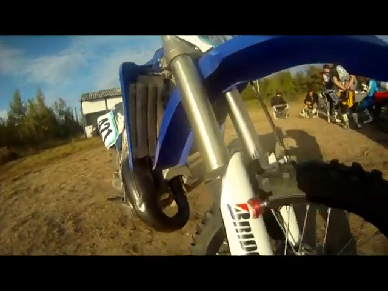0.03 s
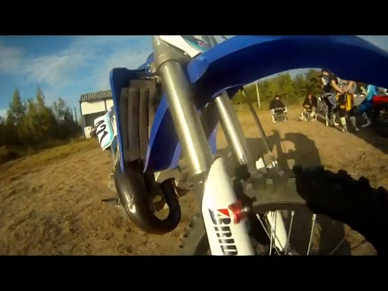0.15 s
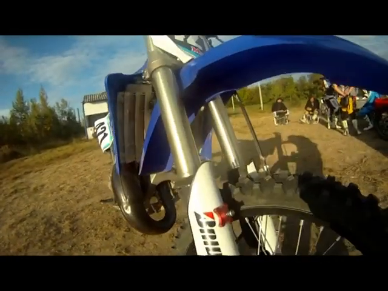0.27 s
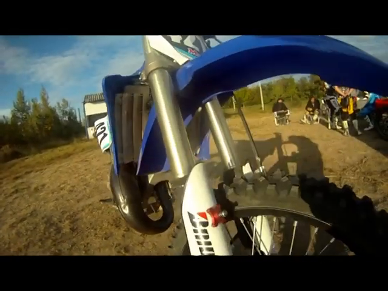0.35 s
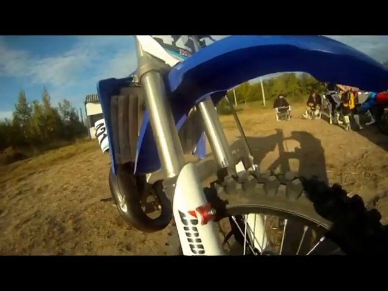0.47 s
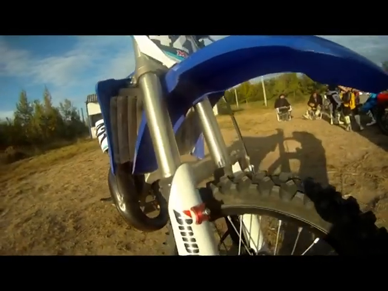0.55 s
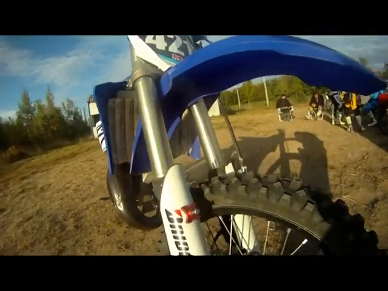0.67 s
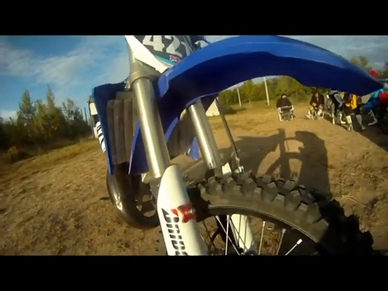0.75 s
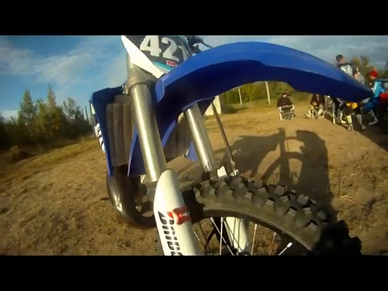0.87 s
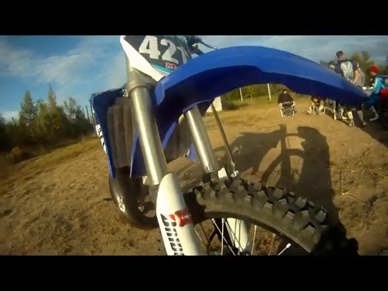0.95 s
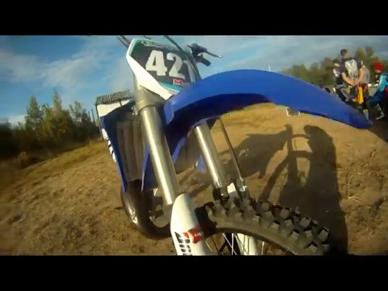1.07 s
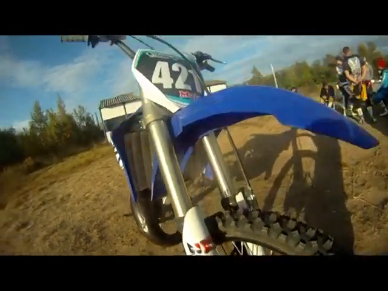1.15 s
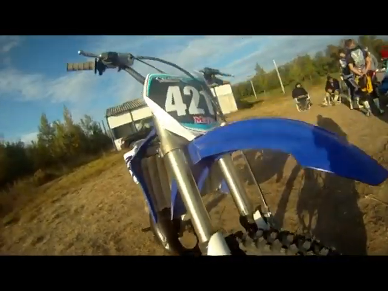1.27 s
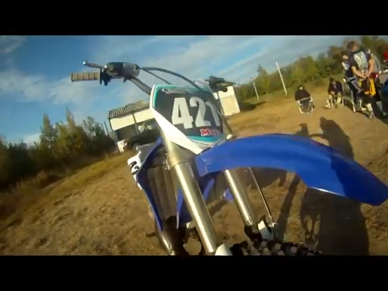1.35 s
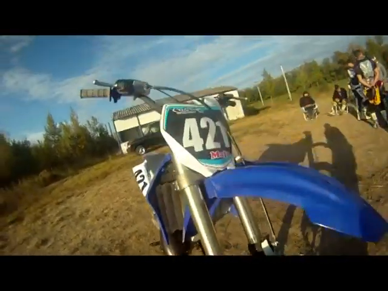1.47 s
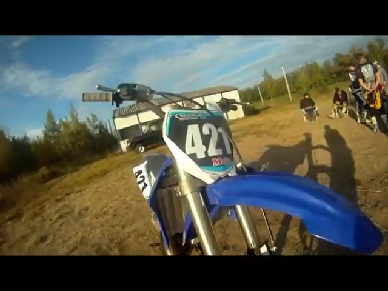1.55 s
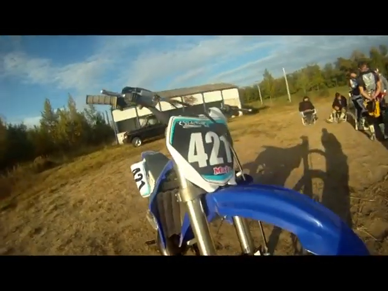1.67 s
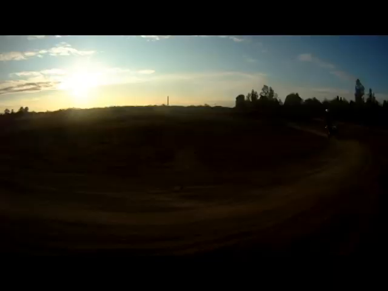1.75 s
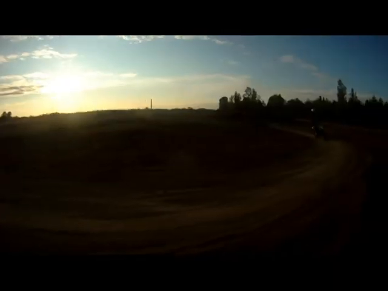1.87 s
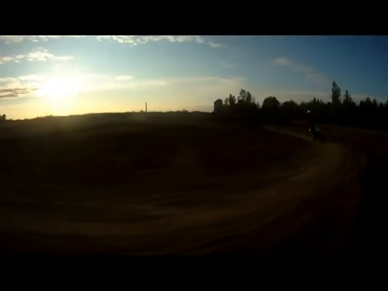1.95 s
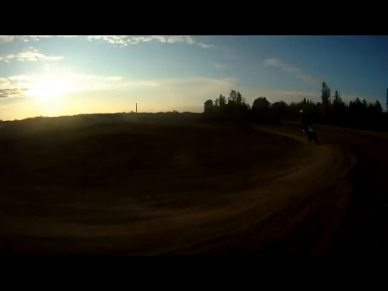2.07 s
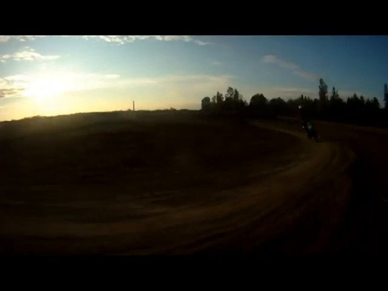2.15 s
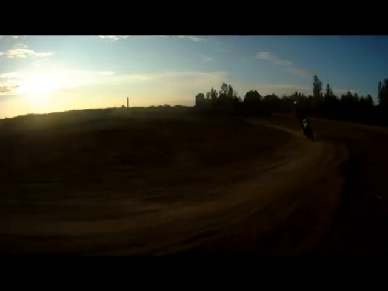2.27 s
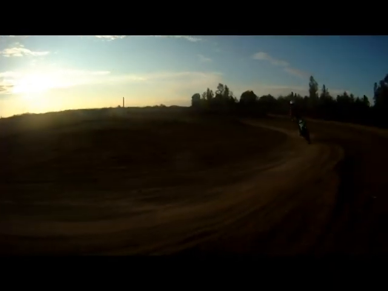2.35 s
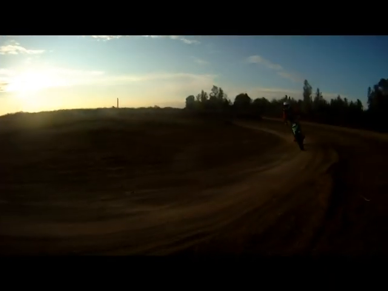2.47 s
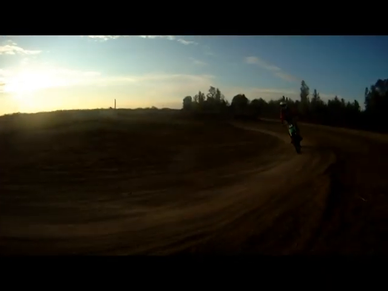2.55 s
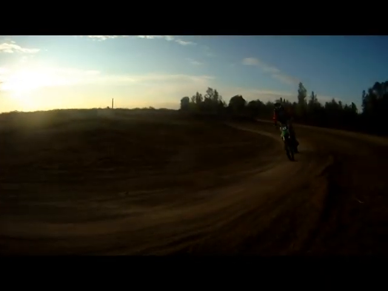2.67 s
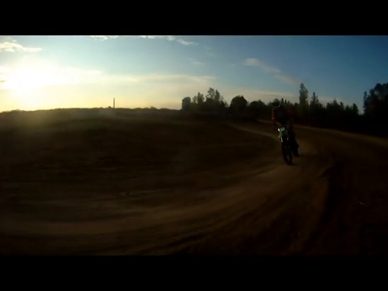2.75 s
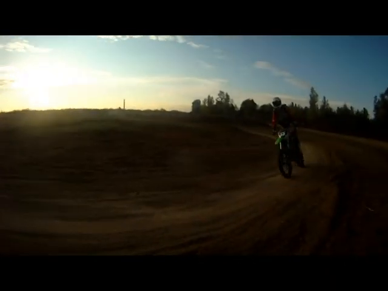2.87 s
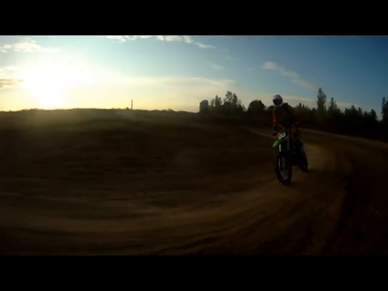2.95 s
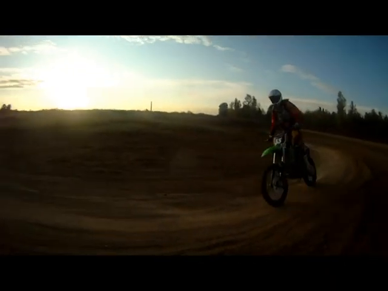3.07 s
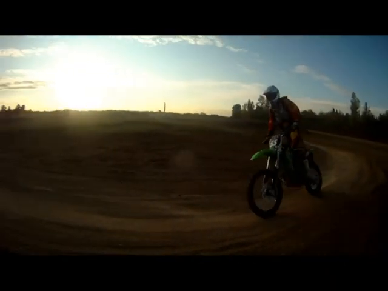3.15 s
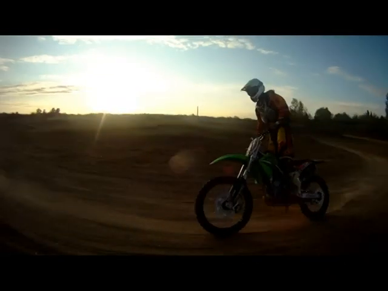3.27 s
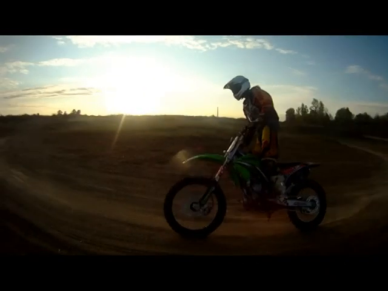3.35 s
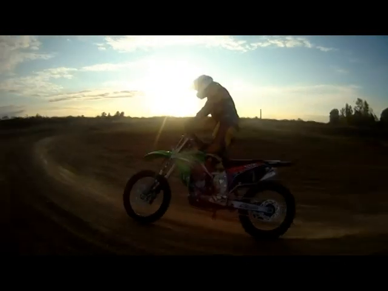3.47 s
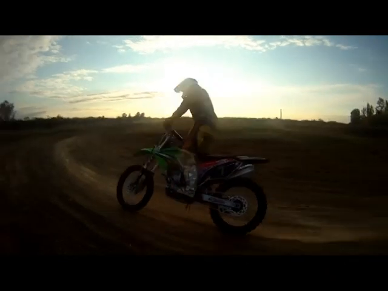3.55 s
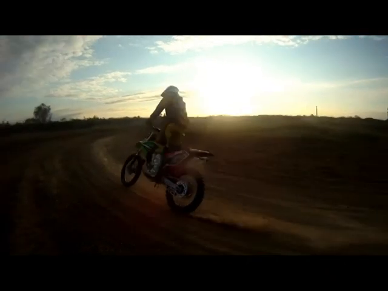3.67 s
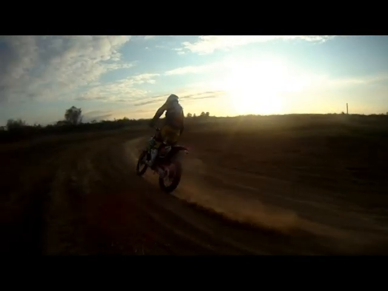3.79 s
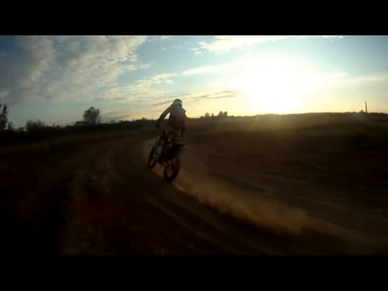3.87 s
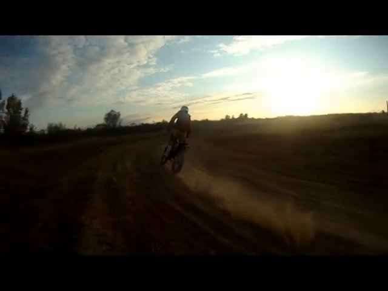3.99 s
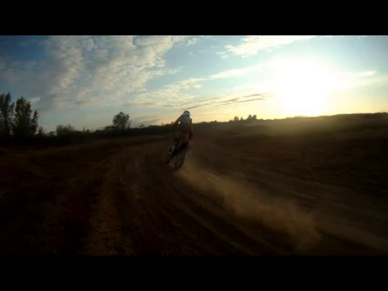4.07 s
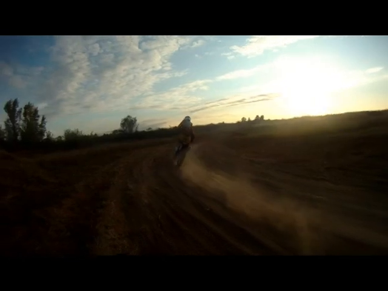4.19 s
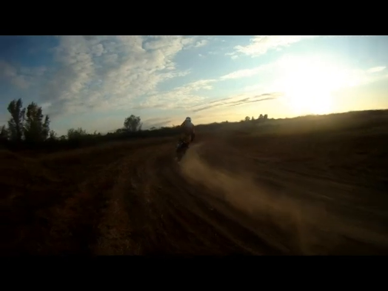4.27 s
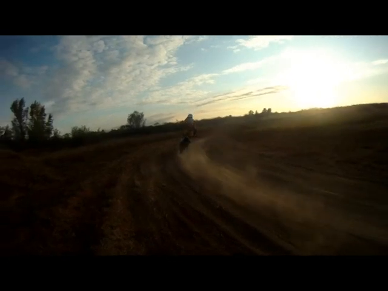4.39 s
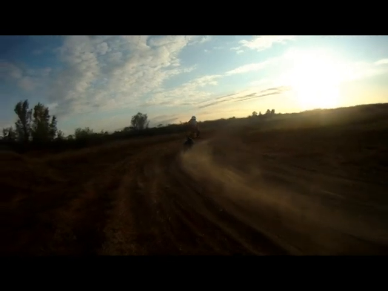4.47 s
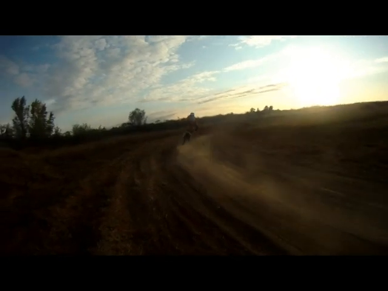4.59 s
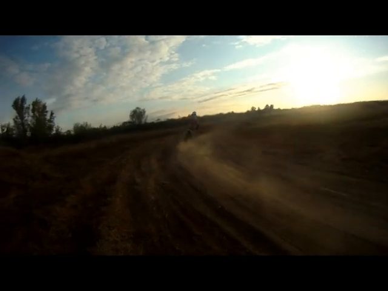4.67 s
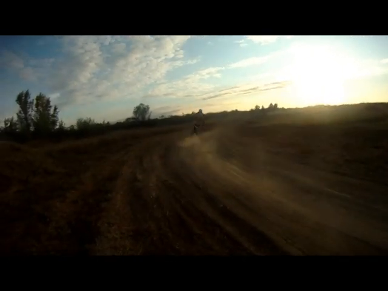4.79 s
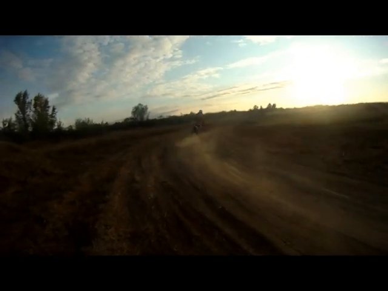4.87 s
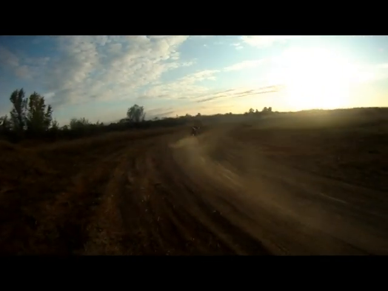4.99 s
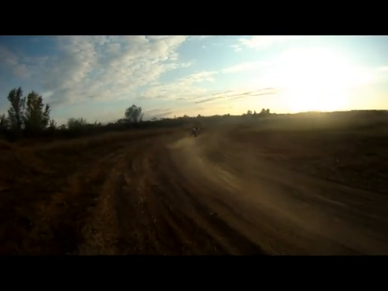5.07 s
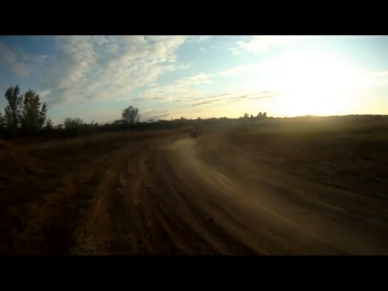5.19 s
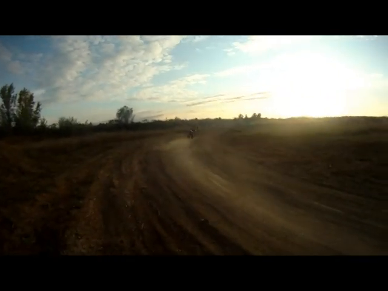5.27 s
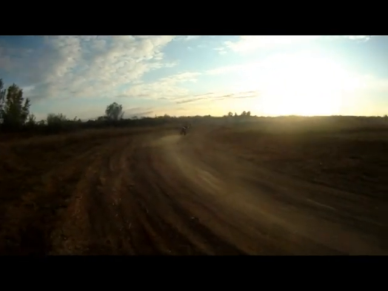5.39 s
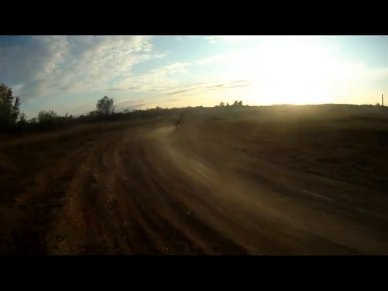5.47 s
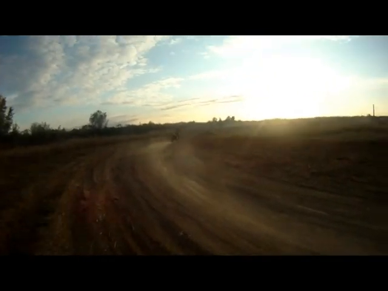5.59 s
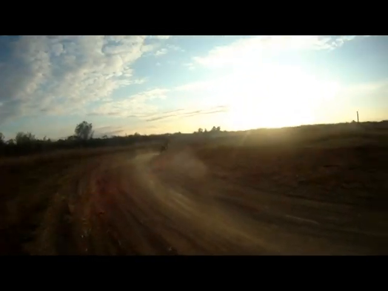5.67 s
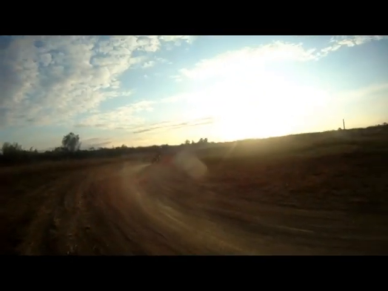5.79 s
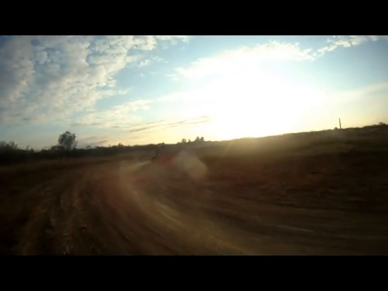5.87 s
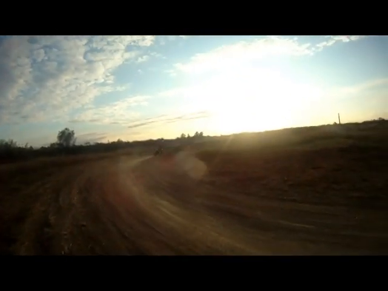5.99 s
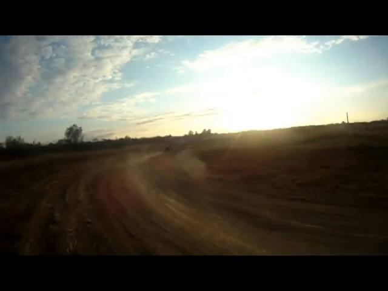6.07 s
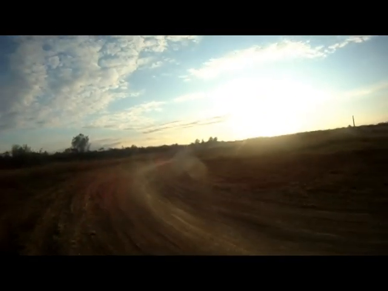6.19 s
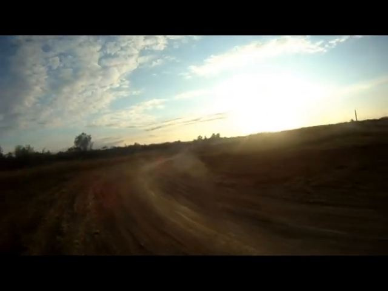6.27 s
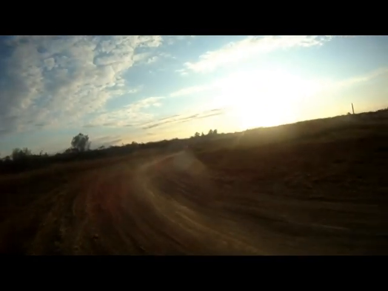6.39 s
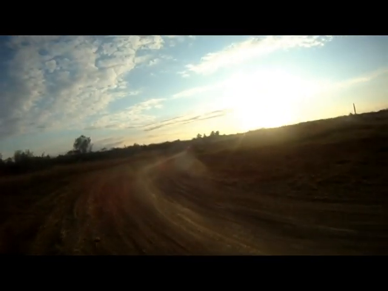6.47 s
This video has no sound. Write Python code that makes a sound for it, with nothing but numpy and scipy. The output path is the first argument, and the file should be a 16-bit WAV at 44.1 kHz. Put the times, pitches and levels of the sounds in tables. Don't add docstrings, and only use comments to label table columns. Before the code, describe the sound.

Wind buffets and cloth rustles over a faint distant engine, a brief silence, then a dirt bike roars past, coasts popping and fades away.

```python
import sys
import numpy as np
from scipy import signal
from scipy.fft import rfft, irfft, next_fast_len
from scipy.io import wavfile
from scipy.ndimage import uniform_filter1d, map_coordinates

SR = 44100
rng = np.random.default_rng(int(sys.argv[2]) if len(sys.argv) > 2 else 0)


def store_pcm(level_fs):
    pcm = np.round(np.clip(level_fs, -1, 1) * 32767).astype(np.int16)
    wavfile.write(sys.argv[1], SR, np.atleast_2d(pcm).T)


def ratio(d):
    e = np.asarray(d, float) / 20
    return 10 ** e


N = 288298
T = np.arange(N) / SR
CUT_S, FADE_IN_S, FADE_OUT_S = 1.8078, (2.022, 2.22), (5.674, 6.005)

# start_s, distance_m, load_0_to_1
RIDE_PATH = [(2.2, 18.4, 0), (2.78, 17, 0.17), (3.1, 9.7, 0.19), (3.16, 5.73, 0.15), (3.4, 3.38, 0.07),
             (3.55, 3.74, 0), (3.63, 4.3, 0.41), (3.73, 3.58, 1), (3.79, 3.7, 0.76), (3.87, 4.97, 0.15),
             (4.2, 15.3, 0.22), (4.6, 16.4, 0.15), (4.85, 15, 0.12), (5.01, 13.5, 0.44), (5.08, 15, 0),
             (5.3, 14, 0.15), (5.45, 19, 0.14), (6.0, 9.9, 0.03)]
# pitch_hz, width_hz, level_db
PIPE_RASP = [(770, 540, -2), (1390, 470, -18.5), (3618, 120, 3), (5000, 1200, -18.5), (2600, 2100, -6.5)]


def curves(table):
    s, *columns = np.transpose(table)
    return [np.interp(T, s, c) for c in columns]


def unit(x):
    return x / np.sqrt(np.mean(x ** 2))


def smooth_twice(x, size):
    return uniform_filter1d(uniform_filter1d(x, size), size)


def walk(rate_hz):
    hold = int(SR / rate_hz)
    levels = np.repeat(rng.standard_normal(N // hold + 1), hold)
    return 1.24 * smooth_twice(levels, hold)[:N]


def held(start, end, edge):
    return np.clip(np.minimum(T - start, end - T) / max(edge, 1e-3) + .5, 0, 1)


def ring(x, modes):
    return sum(ratio(db) * signal.lfilter(*signal.iirpeak(hz, hz / width, SR), x) for hz, width, db in modes)


def steep(x, modes):
    total = 0
    for k, (hz, width, db) in enumerate(modes):
        once = ring(x, [(hz, width, db)])
        total = total + (-1) ** k * ring(once, [(hz, 2 * width, 0)])
    return unit(total)


def colour(x, points):
    hz, db = np.transpose(points)
    size = 16384
    log_hz = np.log(np.fft.rfftfreq(size, 1 / SR) + 1)
    log_gain = np.interp(log_hz, np.log(hz), db) * np.log(10) / 20
    fold = np.r_[1, 2 * np.ones(size // 2 - 1), np.zeros(size // 2)]
    response = irfft(np.exp(rfft(irfft(log_gain) * fold)))[:size // 4]
    return unit(signal.fftconvolve(x, response)[:N])


def firings(cycles):
    index = cycles.astype(int)
    clicks = np.diff(index, prepend=index[0]) * 1.
    return cycles % 1, clicks, rng.standard_normal(N // 100)[index]


def rings(table):
    out = np.zeros(N)
    for s, db, hz, t60 in table:
        t = np.maximum(T - s, 0)
        out += ratio(db - 60 * t / t60) * np.sin(2 * np.pi * hz * t)
    return out


def hiss():
    return ratio(-77) * unit(ring(rng.standard_normal(N), [(230, 200, 4), (1503, 3500, -8.5)]))


def buffets(db, modes):
    eddies = sum(ratio(m[2]) * steep(rng.standard_normal(N), [m]) for m in modes)
    return ratio(db + 2.0 * walk(2.9)) * unit(eddies)


def wind(first, fade):
    # peak_s, level_db, half_length_s
    gusts = [(0.0, -35.5, 0.067), (0.254, -49.5, 0.054), (0.47, -56, 0.046), (0.62, -64, 0.05),
             (0.74, -58, 0.078), (0.99, -48, 0.092), (1.25, -53.5, 0.078), (1.355, -49.5, 0.028),
             (1.584, -45.5, 0.01), (1.71, -58, 0.046), (2.26, -71, 0.067), (3.9, -62.5, 0.44),
             (4.85, -66, 0.45), (5.54, -67, 0.13), (5.87, -55.5, 0.13)]
    # pitch_hz, width_hz, level_db
    buffet_modes = [(22.2, 18.5, 3), (51.4, 60, -4), (101, 37, -16), (219, 200, -36)]
    calm_db = np.where(first, -55.5, -65.5)
    swells = sum(ratio(db) * np.exp(-((T - s) / half) ** 2) for s, db, half in gusts)
    wind_db = 20 * np.log10(ratio(calm_db) + swells)
    exposed = buffets(wind_db - 4, buffet_modes)
    sheltered = buffets(wind_db, [(10, 100, 1), (45, 40, -22)])
    return np.where(first, exposed, fade * sheltered)


def drone():
    # start_s, strong_weak_pair_rate_hz (two firings a pair), level_db
    far_engine = [
        (0, 27.5, -76),
        (.4, 28.1, -72),
        (.75, 28, -72),
        (1.1, 27.2, -69),
        (1.42, 26.8, -68),
        (1.5, 24.4, -68),
        (1.8, 24.4, -68),
    ]
    hz, db = curves(far_engine)
    _, clicks, chance = firings(np.cumsum(2 * hz * (1 + 0.0031 * walk(22.3))) / SR)
    weak = 1 - 0.47 * (np.cumsum(clicks) % 2)
    return ratio(db) * steep(clicks * weak * ratio(1.0 * chance), [(196, 140, 0.98), (268, 78, -7.0)])


def rustle(first):
    # start_s, length_s, level_db
    rubs = [(0.0, 0.0036, -49), (0.06, 0.078, -63.5), (0.276, 0.033, -64.5), (0.375, 0.018, -62.5),
            (0.516, 0.013, -67.5), (0.87, 0.0098, -62.5), (0.932, 0.02, -59.5), (1.02, 0.099, -76),
            (1.31, 0.063, -55.5), (1.415, 0.045, -63), (1.449, 0.092, -55), (1.543, 0.1, -53),
            (1.65, 0.11, -68), (2.028, 0.09, -71.5), (4.048, 0.023, -51.5), (5.76, 0.044, -54.5),
            (5.835, 0.019, -46.5), (5.88, 0.097, -64.5)]
    # pitch_hz, width_hz, level_db
    cloth_modes = [(780, 470, -9.5), (1290, 630, 4.5), (1640, 370, 3.5), (1920, 400, 5.5), (2590, 600, -2),
                   (3450, 410, 2.5), (4860, 570, -5.5)]
    strokes = sum(ratio(db) * held(s, s + length, 0.026) for s, length, db in rubs)
    rub_db = 20 * np.log10(first * ratio(-73.5) + 1e-9 + strokes)
    grains = rng.standard_normal(N) * ratio(2.3 * walk(300) + 0.5 * walk(45.0))
    return ratio(rub_db - 7) * steep(grains, cloth_modes)


def knocks():
    # start_s, level_db, pitch_hz, t60_s
    low_thumps = [
        (.264, -44, 216, 0.029),
        (1.013, -37.5, 200, 0.037),
        (1.776, -37, 24.8, 0.9),
    ]
    return rings(low_thumps)


def ticks():
    # start_s, peak_db, pitch_hz, t60_s
    short_ticks = [(0.267, -58.5, 1060, 0.011), (1.013, -52, 1030, 0.0052), (2.038, -54.5, 1060, 0.013),
                   (2.402, -47.5, 746, 0.0071), (2.494, -48, 704, 0.0089), (4.078, -43.5, 860, 0.012),
                   (4.179, -41.5, 1100, 0.01), (4.382, -47.5, 870, 0.01), (4.679, -42, 810, 0.0031),
                   (4.708, -51, 1040, 0.012), (5.647, -56, 2150, 0.036), (5.779, -45, 1440, 0.0034),
                   (5.838, -27.5, 2200, 0.0031)]
    return ratio(2) * rings(short_ticks)


def pops():
    # start_s, peak_db, t60_s
    late_burns = [(4.026, -38, 0.12), (4.051, -35.5, 0.029), (4.0757, -41.5, 0.1), (4.13, -35, 0.04),
                  (4.157, -64.5, 0.04), (4.1783, -35, 0.015), (4.2048, -42.5, 0.062),
                  (4.2817, -43.5, 0.044), (4.3039, -43.5, 0.04), (4.38, -41.5, 0.033), (4.435, -59, 0.026),
                  (4.5977, -45, 0.04), (5.008, -49.5, 0.072)]
    size = sum((T >= s) * ratio(db - 60 * np.maximum(T - s, 0) / t60) for s, db, t60 in late_burns)
    return ratio(-12.5) * size * unit(ring(rng.standard_normal(N), PIPE_RASP))


def heard_behind():
    return held(3.473, 99, 0.65)


def throttle_shut():
    # from_s, to_s, snap_s
    coasts = [
        (3.861, 4.538, 0.06),
        (5.056, 5.157, 0.046),
    ]
    return sum(held(*row) for row in coasts)


def layer_db(at_1m_db, loss_share, load_db, behind_db, shut_db):
    metres, load = curves(RIDE_PATH)
    loss_db = loss_share * 20 * np.log10(np.maximum(metres, 1))
    return at_1m_db - loss_db + load_db * load + behind_db * heard_behind() + shut_db * throttle_shut()


def puff_share():
    metres, load = curves(RIDE_PATH)
    far = (1 - heard_behind()) * (metres - metres.min())
    return np.clip(0.24 + 0.62 * load + 0.014 * far, 0, .92)


def engine_cycle():
    # start_s, firing_rate_hz
    revs = [(2.0, 31.53), (2.052, 34.51), (3.045, 38.59), (3.31, 43.87), (3.571, 44.64), (3.71, 57.86),
            (3.864, 50.35), (3.875, 41.85), (4.072, 39.33), (4.504, 39.27), (4.597, 46.13), (4.721, 43.09),
            (5.043, 46.02), (5.055, 38.6), (5.316, 53.26), (5.418, 39.56), (6.0, 40.66)]
    inertia = SR // 25
    turns = np.cumsum(curves(revs)[0] * (T >= 2)) / SR
    return firings(smooth_twice(turns, inertia) + .42 + .012 * walk(30))


def ground(x):
    detour_m = 1.17 / np.maximum(curves(RIDE_PATH)[0], 1)
    late = detour_m / 343 * SR
    return x + ratio(-9.5) * map_coordinates(x, [np.arange(N) - late], order=1)


def exhaust(clicks, chance):
    ahead_colour = [(20, -28.5), (37, -23.5), (75, -4), (110, -22.5), (150, -5), (183, 2), (225, -9.5),
                    (280, -12.5), (400, -13), (450, -36), (600, -35), (900, -52.5), (3000, -82)]
    behind_colour = [(20, -27.5), (42, -18), (86, -3.5), (125, -9.5), (170, 2), (215, 3), (260, -1),
                     (305, -13.5), (345, -18.5), (400, -7.5), (480, -19.5), (800, -37), (3000, -79.5)]
    coast_colour = [(20, -35), (39, -29.5), (78, -13.5), (118, -4.5), (155, 2), (196, -8), (240, -15.5),
                    (314, -26), (390, -49), (600, -55), (3000, -86)]
    thump_colour = [(20, -34), (55, 0), (80, 7), (115, 11), (160, -10.5), (400, -56.5), (3000, -86)]
    bark_colour = [(20, -70.5), (300, -32), (420, -7), (520, -3.5), (660, 2), (800, -18), (1100, -24.5),
                   (3000, -47)]
    # middle_s, level_change_db
    misfires = [
        (4.0, -4),
        (4.103, -6),
        (4.24, -3),
        (4.33, -4),
        (4.408, -6),
        (4.485, -7),
        (4.512, -5),
        (5.08, -4),
    ]
    behind = heard_behind()
    throttle = np.clip(1 - throttle_shut(), 0, 1)
    boom_db = layer_db(-36, 0.503, 8, -1, 3)
    boom_db = boom_db + sum(db * held(s - 0.012, s + 0.012, 0.0026) for s, db in misfires)
    bark_db = layer_db(3, 0.99, 7.5, 7, -14.5)
    pulses = -clicks * ratio((.8 + .8 * (1 - throttle)) * chance)
    open_pipe = (1 - behind) * colour(pulses, ahead_colour) + behind * colour(pulses, behind_colour)
    pipe = throttle * open_pipe + (1 - throttle) * ratio(4.5) * colour(pulses, coast_colour)
    close = ratio(-1.0) * np.exp(-((T - 3.7) / 0.29) ** 2)
    pipe += close * colour(pulses, thump_colour)
    pipe += ratio(bark_db) * colour(pulses, bark_colour)
    return ratio(boom_db - 8) * ground(pipe)


def gas_rasp(puff):
    # pitch_hz, width_hz, level_db
    intake_modes = [(790, 420, -1.5), (1233, 220, -1), (3220, 540, 0.5), (4460, 500, -12.5),
                    (2650, 1500, -15)]
    behind, puffed = heard_behind(), puff_share()
    gas = rng.standard_normal(N)
    air = (1 - behind) * unit(ring(gas, intake_modes)) + behind * unit(ring(gas, PIPE_RASP))
    rasp_db = layer_db(-30, 1.5, 14.5, 0, -2.4)
    return ratio(rasp_db - 0.5) * ((1 - puffed) + puffed * puff) * air


def chain_clatter(puff):
    # pitch_hz, width_hz, level_db
    metal_modes = [(740, 330, -16), (1310, 67, -6), (2152, 330, 3), (2470, 63, -12), (3200, 430, -10.5),
                   (3685, 270, -3)]
    pulsing = puff_share() * heard_behind()
    wobble = ratio(1.3 * walk(45)) * (1 - 2.04 * pulsing + 1.24 * pulsing * puff)
    clatter_db = layer_db(-32.5, 1.35, 19.5, 1, -5.7)
    return ratio(clatter_db - 5) * wobble * steep(rng.standard_normal(N), metal_modes)


def bike():
    phase, clicks, chance = engine_cycle()
    puff = unit(phase / .06 * np.exp(-phase / 0.17)) * ratio(0.7 * chance)
    return exhaust(clicks, chance) + gas_rasp(puff) + chain_clatter(puff)


def scene():
    first = T < CUT_S + .05
    fade = np.interp(T, [*FADE_IN_S, *FADE_OUT_S], [0, 1, 1, 0])
    air = wind(first, fade) + (first + fade) * hiss()
    handling = rustle(first) + first * knocks() + ticks()
    ride = fade * (bike() + pops())
    return (air + first * drone() + handling + ride)[None]


def coarse_sampling(dry):
    hold_hz, lag_s = 12000, 166.3 / 44100
    band = signal.sosfilt(signal.ellip(6, .5, 45, 5500, fs=SR, output="sos"), dry)
    mirrored = band * (1 + 2 * np.cos(2 * np.pi * hold_hz * T))
    size = next_fast_len(N + 4096)
    f = np.fft.rfftfreq(size, 1 / SR)
    early = ratio(3.5) / (1 + 1.2j * f / 8500 - (f / 8500) ** 2) ** 2
    late = np.exp(-2j * np.pi * f * (lag_s + .00005)) * (1 + 1.77 * (f / 12500) ** 4)
    top = 1 / (1 + (f / 15350) ** 90)
    steps = np.sinc(f / hold_hz)
    return irfft(rfft(mirrored, size) * steps * (early + late) * top, size)[:, :N]


def top_cut(x):
    return signal.sosfilt(signal.butter(12, 16340, fs=SR, output="sos"), x)


def record(dry):
    shots = (T < CUT_S) | ((T > FADE_IN_S[0]) & (T < FADE_OUT_S[1]))
    settling = -ratio(-73.0) * (T >= CUT_S) * np.exp(-np.abs(T - CUT_S) / .1)
    return top_cut(coarse_sampling(dry) * shots + settling)


dry = scene()
out = record(dry)
store_pcm(out)
```